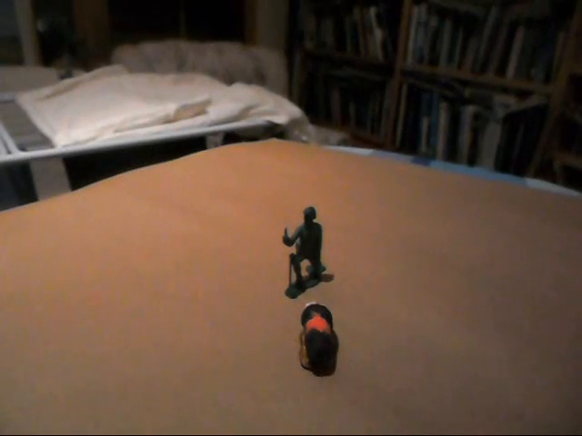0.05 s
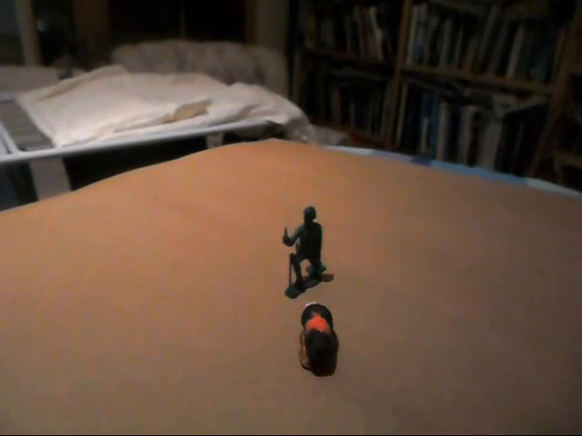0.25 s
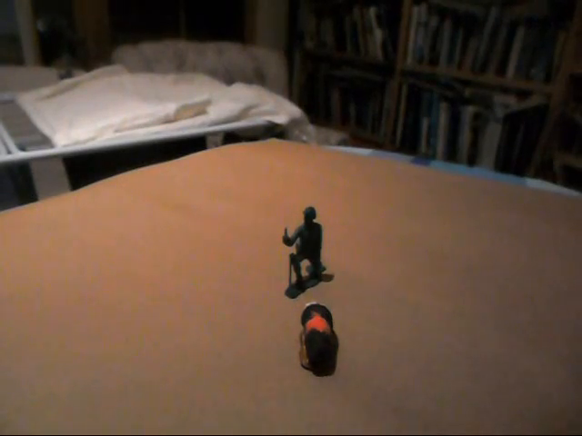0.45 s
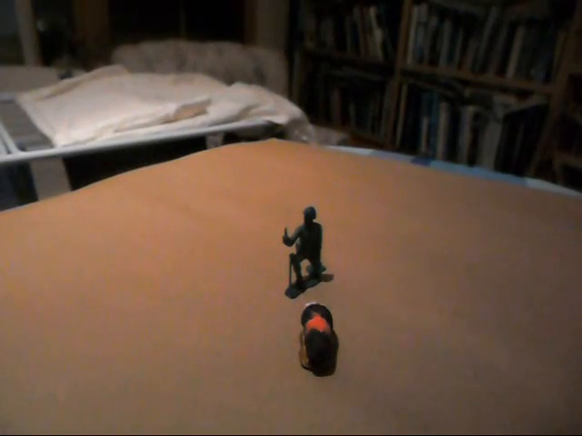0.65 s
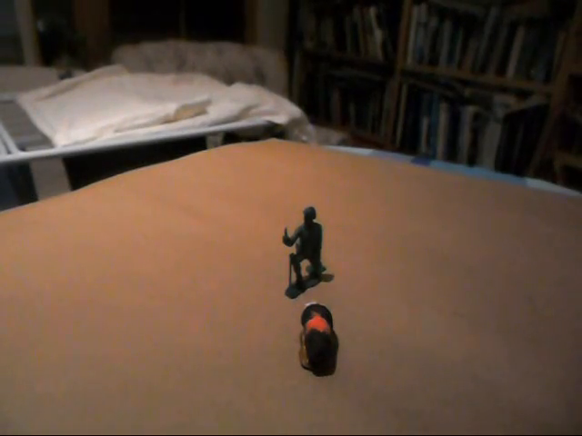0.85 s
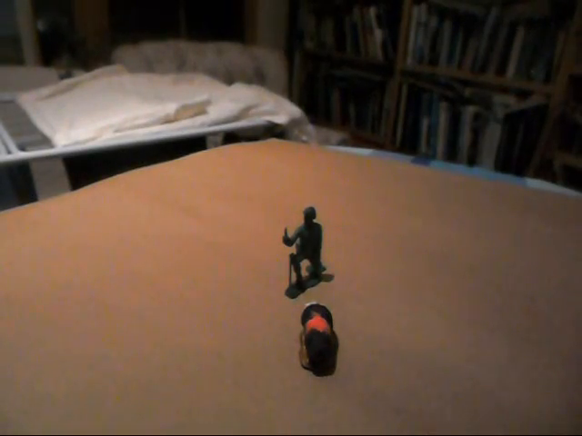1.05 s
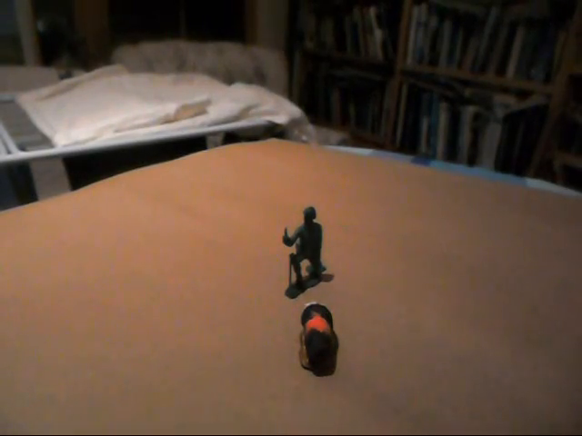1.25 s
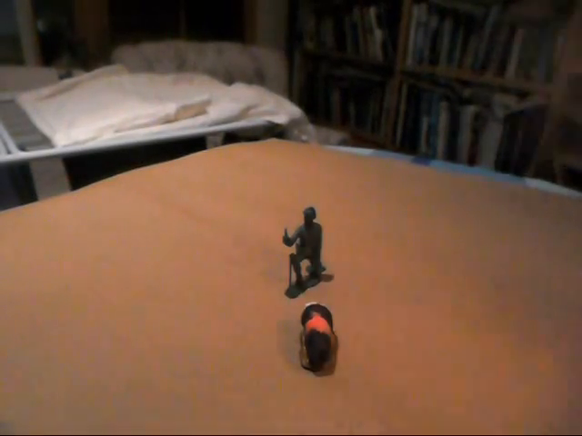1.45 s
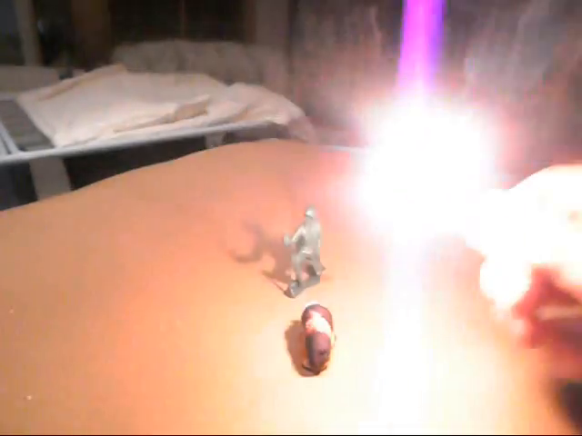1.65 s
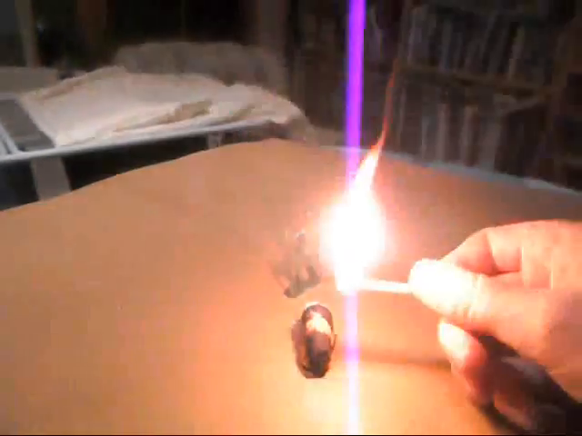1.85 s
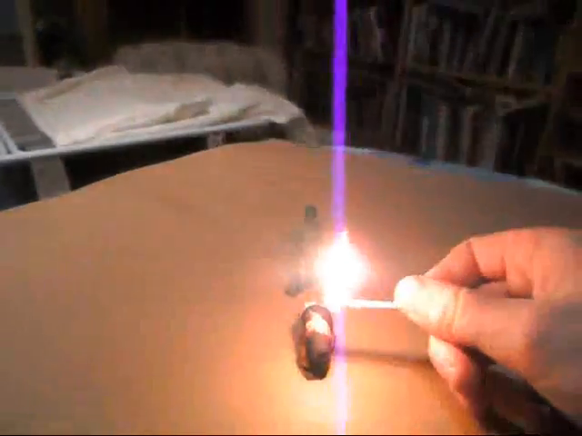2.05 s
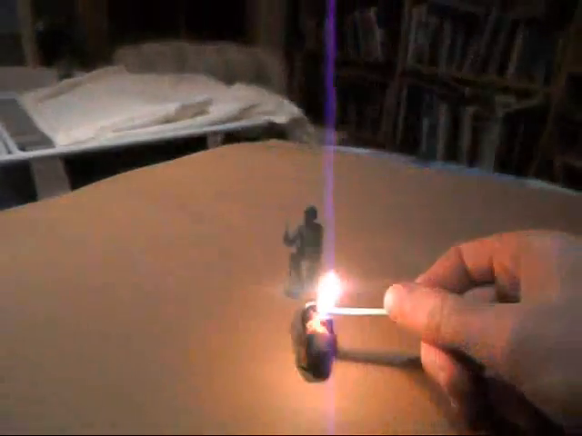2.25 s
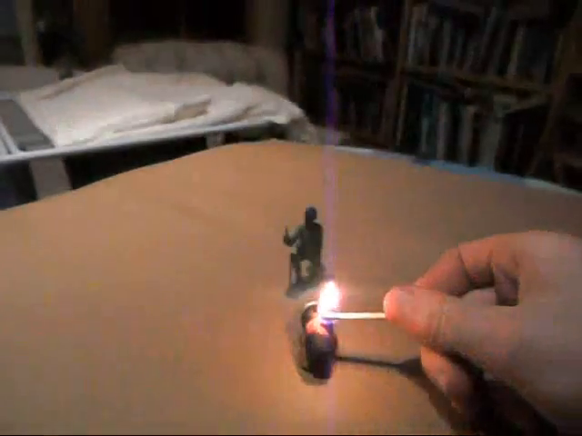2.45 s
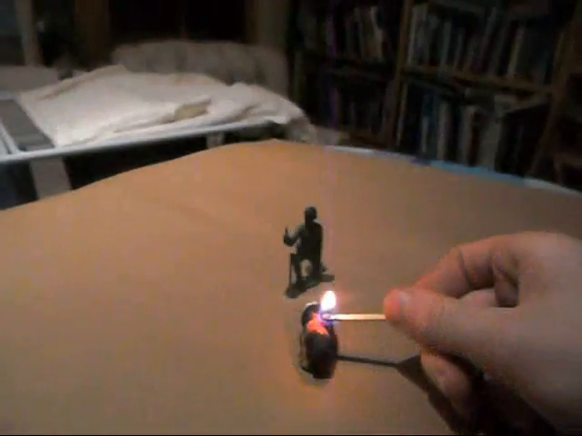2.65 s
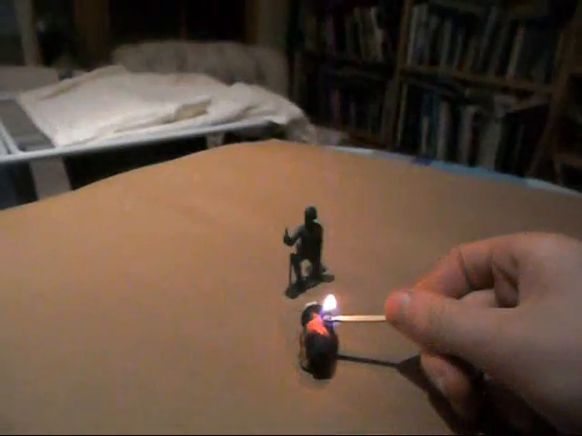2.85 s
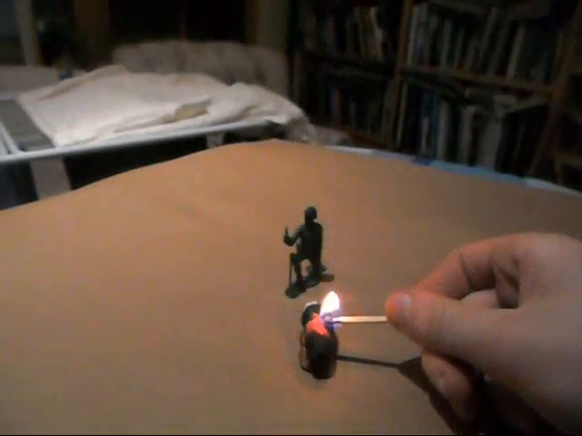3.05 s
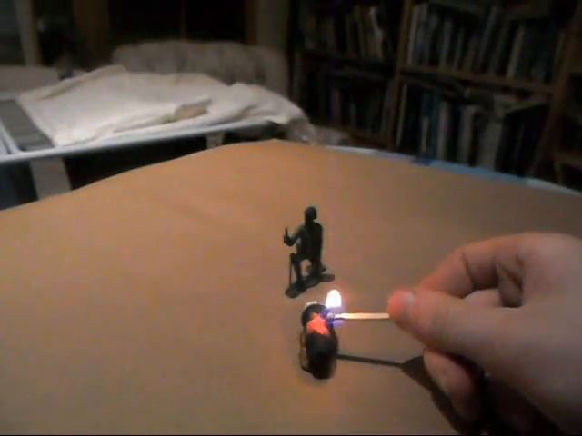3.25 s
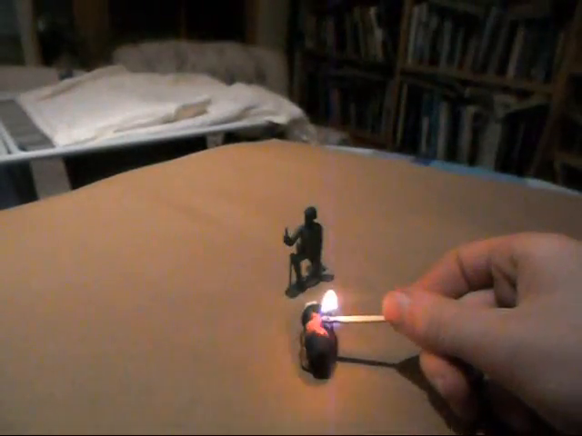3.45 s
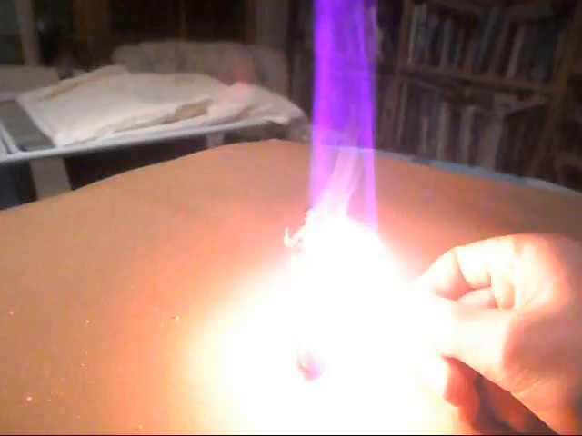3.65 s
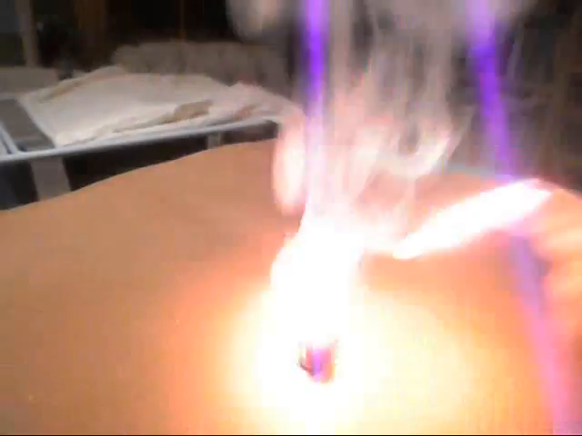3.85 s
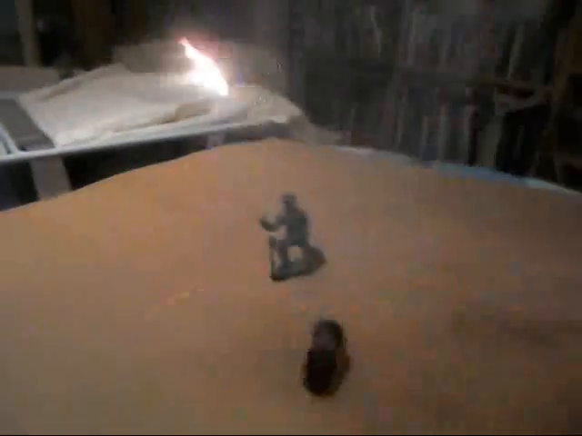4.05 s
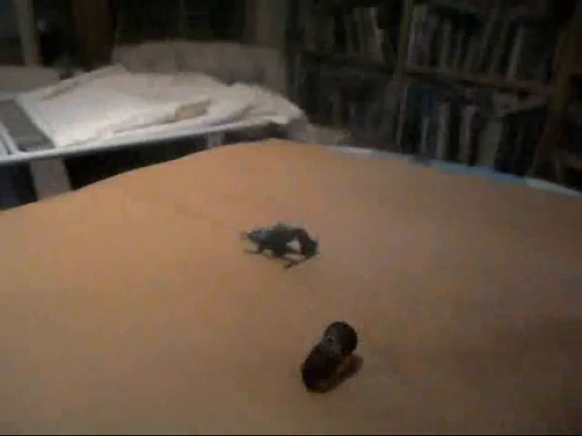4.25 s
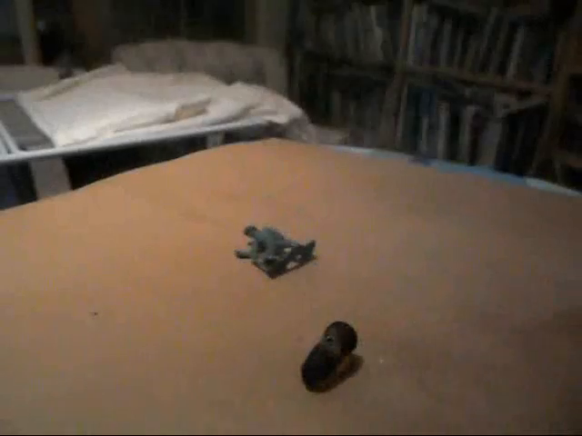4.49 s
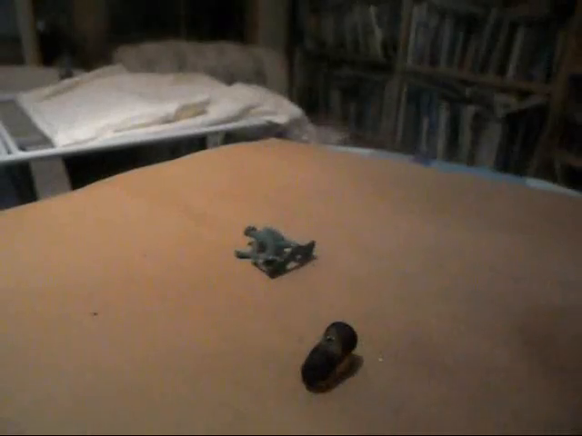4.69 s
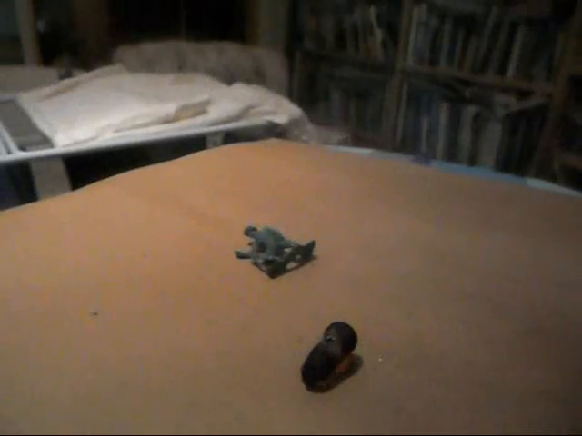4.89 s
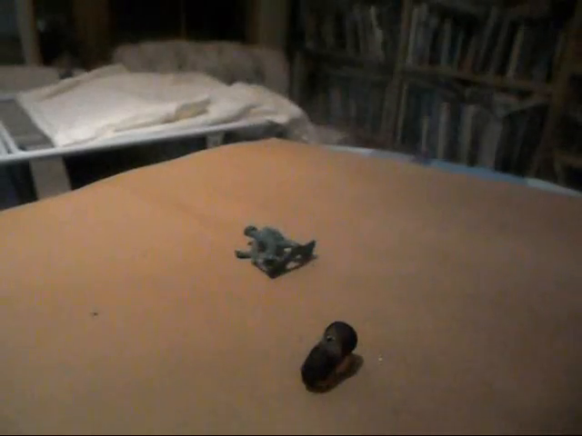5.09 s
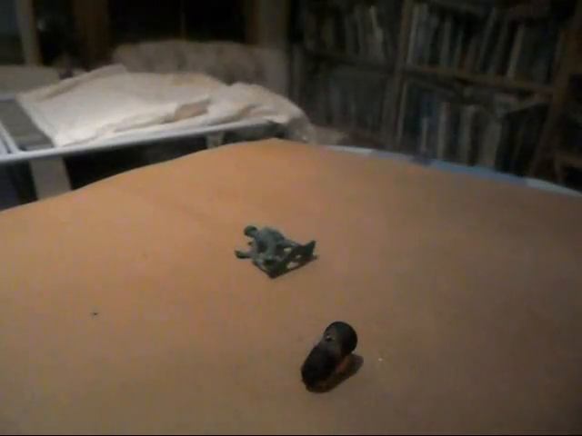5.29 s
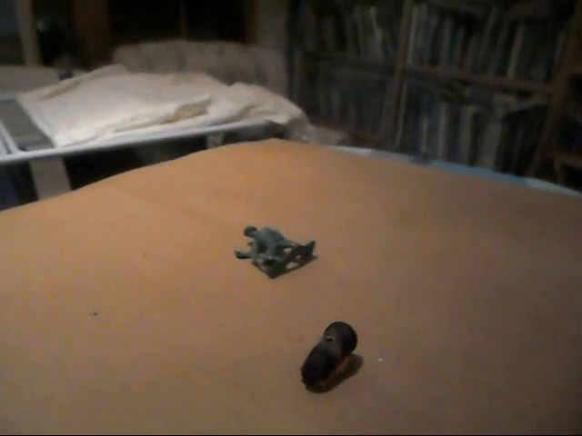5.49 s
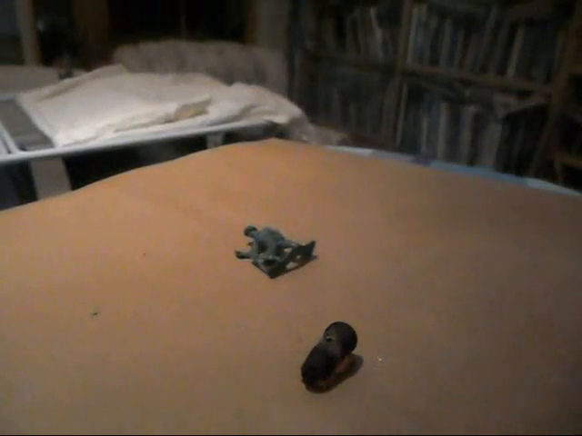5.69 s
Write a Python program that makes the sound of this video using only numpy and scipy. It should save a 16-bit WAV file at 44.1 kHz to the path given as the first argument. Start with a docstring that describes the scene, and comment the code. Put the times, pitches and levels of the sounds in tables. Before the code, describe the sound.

A sharp little matchbox knock opens the sound, with soft cardboard rustling and two lighter clicks in the first half second. Faint scrapes come around 0.8 and 1.1 seconds. At about 1.2 seconds a match rasps along the strip with a few bright snaps, then flares in a soft, crackling hiss until 1.9 seconds. A lull follows, holding only faint microphone hiss, low rumble and a tiny tick or two. The flame flutters softly at 3.5 seconds. From 3.7 seconds priming powder fizzes and sputters, and just before 4.1 seconds a tiny cannon fires with one sharp pop, by far the loudest sound. It overloads the close, cheap microphone, and the small room rings for under half a second. Everything afterwards is quieter, including the hiss. A few very faint, dull taps come between 4.3 and 5.7 seconds as the barrel and a toy figure rock on the table.

```python
"""A tiny cannon pops on a bedroom table: a pressure push snaps into suction and the bore rings.
Before it, a matchbox knocks and rustles, a match rasps along the strip and flares, the flame
flutters at the touch-hole and the priming fizzes. The shot overloads a cheap camera microphone,
whose gain drops and stays down. The room rings briefly and the barrel rocks to rest."""
import sys
import numpy as np
from scipy import signal
from scipy.fft import rfft, irfft, next_fast_len
from scipy.io import wavfile
from scipy.ndimage import uniform_filter1d

SR = 44100
rng = np.random.default_rng(int(sys.argv[2]) if len(sys.argv) > 2 else 0)


def output_pcm(signal):
    """Save a mono or channel-first signal as 16-bit PCM at the path in sys.argv[1].

    Samples are clipped to [-1, 1] before scaling.
    """
    pcm = np.clip(np.atleast_2d(signal).T, -1, 1) * 32767
    wavfile.write(sys.argv[1], SR, np.round(pcm).astype(np.int16))


N = 252693
SHOT_S = 4.07183


def gain_of(db):
    """Decibels to linear gain."""
    return 10 ** (np.asarray(db) / 20)


def unit_rms(x):
    """Scales to rms 1."""
    return x / np.sqrt(np.mean(x ** 2) + 1e-20)


def value_at(points, hz):
    """Reads a curve on a log-frequency axis."""
    f, value = np.transpose(points)
    return np.interp(np.log(hz + 1), np.log(f + 1), value)


def coloured(x, tone):
    """Applies an EQ curve and scales to rms 1."""
    size = next_fast_len(len(x))
    eq = gain_of(value_at(tone, np.fft.rfftfreq(size, 1 / SR)))
    return unit_rms(irfft(rfft(x, size) * eq, size)[:len(x)])


def automation(rows):
    """Rows of (seconds, dB, ...) to curves: a gain, silent outside the rows, then any other columns."""
    s, db, *more = np.transpose(rows)
    t = np.arange(N) / SR
    fade = np.clip(np.minimum(t - s[0] + (s[0] == 0), s[-1] - t) / 0.0036, 0, 1)
    return [fade * gain_of(np.interp(t, s, db))] + [np.interp(t, s, c) for c in more]


def add(mix, start_s, sound):
    """Mixes a sound in at its start time."""
    part = mix[round(start_s * SR):][:len(sound)]
    part += sound[:len(part)]


def resonate(x, hz, width_hz):
    """A resonance: shifts hz down to zero, smooths and shifts back."""
    carrier = np.exp(2j * np.pi * np.cumsum(hz * np.ones(len(x))) / SR)
    pole = np.exp(-np.pi * width_hz / SR)
    return 2 * (carrier * signal.lfilter([1 - pole], [1, -pole], x / carrier + 1e-18)).real


def grains(per_s, spread_db, t60):
    """Tiny noise bursts at random times, slightly varied in size."""
    sizes = gain_of(spread_db * np.minimum(rng.exponential(1, N), 4))
    onsets = rng.random(N) < per_s / SR
    decay = gain_of(-60 * np.arange(400) / SR / t60)
    return unit_rms(signal.oaconvolve(sizes * onsets, decay)[:N] * rng.standard_normal(N))


def patchy(x, depth_db):
    """Lets patches of the spectrum swell and fade at random."""
    spectrum = signal.stft(x, nperseg=256)[2]
    patches = uniform_filter1d(rng.standard_normal(spectrum.shape), size=7, axis=0)
    patches = unit_rms(uniform_filter1d(patches, size=9, axis=1))
    return unit_rms(signal.istft(spectrum * gain_of(depth_db * patches), nperseg=256)[1][:N])


def ticks(rows, relative_width):
    """Short noise bursts, each through its own resonance."""
    out, t = np.zeros(N), np.arange(2000) / SR
    for s, db, hz, length in rows:
        envelope = np.exp(-2 * t / length) * (1 - np.exp(-t / 0.00026))
        burst = resonate(rng.standard_normal(len(t)) * envelope, hz, relative_width * hz)
        add(out, s, gain_of(db) * burst / abs(burst).max())
    return out


def noise_floor():
    """Steady hiss and low rumble."""
    # Noise spectrum. Each row: frequency in Hz, level in dB.
    tone = [(12, -23), (20, 0), (38, 4.5), (64, -5.5), (290, -8), (1100, -13.5), (3400, -17.5), (7000, -20),
            (11500, -22.5)]
    return gain_of(-51.5) * coloured(rng.standard_normal(N), tone)


def bedroom_reverb(x, predelay_s):
    """Reflections as sparse taps of random sign, each band dying at its own speed."""
    # Room decay. Each row: frequency in Hz, time to fall 60 dB in seconds.
    decay_times = [(60, .25), (150, 0.35), (300, 0.36), (700, 0.4), (2500, .4), (9000, 0.33)]
    taps, slots = np.zeros(SR), np.arange(0, SR - 20, 20)
    taps[slots + rng.integers(0, 20, len(slots))] = rng.choice([-1., 1.], len(slots))
    hz, t, spectrum = signal.stft(taps, SR, nperseg=256)
    decay = gain_of(-60 * t / value_at(decay_times, hz)[:, None])
    tail = signal.istft(spectrum * decay, SR, nperseg=256)[1][:SR]
    tail *= np.clip((np.arange(SR) / SR - predelay_s) / 0.0042, 0, 1)
    return signal.fftconvolve(x, tail / np.linalg.norm(tail))[:N]


def box_knocks():
    """Handling knocks set the matchbox ringing."""
    # Knocks. Each row: start in seconds, peak in dB.
    knocks = [(0.0144, -14), (0.0207, -22.5), (.341, -34), (0.369, -36.5)]
    # Box modes. Each row: frequency in Hz, relative level in dB, time to fall 60 dB in seconds.
    modes = [(810, -12, 0.015), (2170, -27, 0.0071), (2550, 10, 0.0091), (3300, 3, 0.0087),
             (4000, -3, 0.016), (6000, 2, 0.0084)]
    out, t = np.zeros(N), np.arange(2000) / SR
    ring = sum(gain_of(db - 60 * t / t60) * np.sin(2 * np.pi * hz * t) for hz, db, t60 in modes)
    for s, db in knocks:
        add(out, s, -gain_of(db) * ring / abs(ring).max())
    return out


def tray_rustle():
    """The cardboard tray slides: a grainy rustle that starts at once and dies away."""
    # Slides. Each row: start in seconds, hold in seconds, level in dB.
    slides = [(0, 0.018, -41.5), (.143, 0.073, -44.5)]
    # Rustle EQ. Each row: frequency in Hz, level in dB.
    tone = [(180, -11), (300, -2.5), (459, -9), (850, 0), (942, -3), (1930, -1), (2110, 0.5), (10000, -17),
            (13000, -46), (22000, -120)]
    release_s, drop_db = .11, 19
    level = sum(automation([(s, db), (s + hold, db), (s + hold + release_s, db - drop_db)])[0]
                for s, hold, db in slides)
    return level * coloured(grains(per_s=4700, spread_db=-2.0, t60=0.0048), tone)


def match_strikes():
    """The match head is pressed along the strip and lifted; dense slips ring the cardboard."""
    # Strokes. Each row: start, peak and end in seconds, top level in dB, loudest region in Hz.
    strokes = [(0.803, 0.803, .812, -47, 1090), (.845, .862, .879, -42, 1100),
               (1.063, 1.08, 1.094, -43, 970), (1.162, 1.23, 1.254, -29, 1330)]
    # Cardboard resonances. Each row: centre in Hz, width in Hz, relative level in dB.
    resonances = [(480, 120, 2.5), (1060, 470, -1), (1330, 380, -0.5), (1780, 1400, -3), (2200, 380, -1.5),
                  (3000, 600, 1), (4370, 1200, 2), (7000, 4300, 5)]
    press_db_per_s, lift_db_per_s, sink_octaves_per_s = 340, 250, 9.4
    out, span = np.zeros(N), slice(0, round(1.3 * SR))
    slips = grains(per_s=5000, spread_db=.8, t60=.004)[span]
    modes = np.array([unit_rms(resonate(resonate(slips, hz, width), hz, width))
                      for hz, width, _ in resonances])
    mode_hz, _, mode_db = np.transpose(resonances)[:, :, None]
    for start, peak, end, db, hz in strokes:
        press_s = peak - start
        touch = (start, db - press_db_per_s * press_s, hz * 2 ** (sink_octaves_per_s * press_s))
        lift = (end, db - lift_db_per_s * (end - peak), hz)
        level, focus_hz = automation([touch, (peak, db, hz), lift])
        # The grip damps modes away from the focus.
        weight = gain_of(mode_db - 14.2 * abs(np.log2(mode_hz / focus_hz[span])))
        rasp = level[span] * (weight * modes).sum(0) / np.linalg.norm(weight, axis=0)
        out[span] += rasp * np.linalg.norm(level) / np.linalg.norm(rasp)
    return out


def burning(envelope, tone, echo, crackle_share, grains_per_s, flicker_db, patch_db):
    """Flickering turbulent hiss and crackling grains, comb-filtered by the table's echo."""
    flicker = gain_of(flicker_db * unit_rms(uniform_filter1d(rng.standard_normal(N), size=400)))
    hiss = patchy(coloured(flicker * rng.standard_normal(N), tone), patch_db)
    crackle = coloured(grains(grains_per_s, spread_db=0.5, t60=0.004), tone)
    blend = np.sqrt(1 - crackle_share) * hiss + np.sqrt(crackle_share) * crackle
    direct = automation(envelope)[0] * blend
    samples = np.arange(N)
    delay_ms = np.interp(samples / SR, *np.transpose(echo))
    bounce = np.interp(samples - delay_ms * SR / 1000, samples, direct)
    bounce_gain = gain_of(-4 - 18 * delay_ms)  # a higher flame has a later, weaker echo
    return (direct + bounce_gain * bounce) / np.hypot(1, bounce_gain)


def match_flare():
    """The head flares and settles; its echo closes in as the match is lowered."""
    # Flare envelope. Each row: time in seconds, level in dB.
    envelope = [(1.244, -36), (1.26, -36.5), (1.3, -39), (1.45, -39.5), (1.54, -40), (1.645, -38),
                (1.78, -46), (1.89, -45.5), (1.905, -56), (1.94, -63)]
    # Flame EQ. Each row: frequency in Hz, level in dB.
    tone = [(35, -28), (60, -13), (230, -2), (412, -6.5), (720, 0), (1250, -3.5), (2280, -2), (6000, -5),
            (11500, -11.5)]
    # Table echo. Each row: time in seconds, delay in milliseconds.
    echo = [(1.3, .55), (1.45, .63), (1.55, .51), (1.64, .44), (1.73, .33), (1.8, .25), (1.85, .22),
            (1.9, .205)]
    return burning(envelope, tone, echo,
                   crackle_share=0.12, grains_per_s=540, flicker_db=1.0, patch_db=2.5)


def flame_flutter():
    """One soft, low gust of the flame at the touch-hole."""
    # Gust EQ. Each row: frequency in Hz, level in dB.
    tone = [(59, -43), (100, -5), (323, 0), (967, -18), (1080, -19), (1340, -22), (4000, -23), (5200, -62),
            (8800, -120)]
    level = automation([(3.45, -59.5), (3.47, -47.5), (3.52, -47.5), (3.56, -59.5)])[0]
    return level * coloured(rng.standard_normal(N), tone)


def sparks():
    """Sparks and grains snap in bright, wide-band clicks."""
    # Snaps. Each row: start in seconds, peak in dB, centre in Hz, length in seconds.
    snaps = [(1.208, -30.5, 4900, 0.0039), (1.2455, -22, 4000, 0.0023), (1.2478, -13.5, 1320, 0.0043),
             (1.2525, -20, 910, 0.0042), (1.2665, -19, 2000, 0.0067), (1.689, -31, 2000, 0.0018),
             (1.721, -24, 7000, 0.0014), (2.062, -35.5, 6000, 0.0017), (3.417, -41, 3500, 0.0023),
             (3.7012, -29, 3000, 0.00076), (3.7058, -33, 3000, 0.0013), (4.375, -34, 6000, 0.0011)]
    return ticks(snaps, relative_width=1.5)


def priming_fizz():
    """The priming powder burns as a jet from the touch-hole, just above the table."""
    # Jet envelope. Each row: time in seconds, level in dB.
    envelope = [(3.698, -37), (3.715, -35.5), (3.74, -28.5), (3.85, -33), (3.94, -33), (4.02, -39.5),
                (4.05, -35.5), (4.084, -27.5)]
    # Jet EQ. Each row: frequency in Hz, level in dB.
    tone = [(35, -42.5), (60, -13), (150, -5.5), (395, -5.5), (674, 0), (1000, -2.5), (1770, -1.5),
            (3000, -7.5), (4100, -9), (4700, -15), (7000, -15.5), (11500, -13.5)]
    # Table echo. Each row: time in seconds, delay in milliseconds.
    echo = [(3.7, .28), (4.06, .26)]
    return burning(envelope, tone, echo,
                   crackle_share=.15, grains_per_s=700, flicker_db=-0.14, patch_db=2.0)


def rocking():
    """The barrel and a toy figure rock on the table after the shot, in dull taps."""
    # Taps. Each row: start in seconds, peak in dB before the gain drops, centre in Hz, length in seconds.
    taps = [(4.265, -25.5, 143, 0.0095), (4.426, -40, 298, 0.0096), (4.79, -42, 297, 0.023),
            (4.992, -40.5, 750, 0.012), (5.688, -38, 644, 0.01), (5.72, -41, 1000, .006)]
    return ticks(taps, relative_width=0.43)


def muzzle_blast():
    """Pressure builds roughly, breaks off and swings into suction while the bore rings."""
    t = np.arange(N) / SR - SHOT_S
    after = np.maximum(t, 0)
    grit = unit_rms(resonate(rng.standard_normal(N), hz=8500, width_hz=2000))  # hot grains leave first
    roughness = 1 + .07 * np.clip(-t / .001, 0, 1) * grit
    push = 2.4 / (1 + np.exp(np.clip(-(t + .00125) / .00038, -50, 50))) * roughness
    suction = -.88 * np.exp(-(after / .0052) ** 2) - 1.5 * np.exp(-after / .0003)
    bore = .5 * np.exp(-after / .009) * np.cos(2 * np.pi * 715 * (after - .0012))
    crossfade = 1 / (1 + np.exp(np.clip(-t / .00006, -50, 50)))
    return (1 - crossfade) * push + crossfade * (suction + bore)


def cannon_shot():
    """The close blast, then walls and room answering its sharp front."""
    # Early reflections. Each row: delay in seconds, level in dB relative to the pulse.
    reflections = [(.0121, -3), (.0148, -1.5), (.0178, 1), (.0189, -4), (.0226, -5.5)]
    # Reverb send EQ. Each row: frequency in Hz, level in dB.
    send_tone = [(50, -6.5), (200, 6.5), (700, 1.5), (1250, -2.5), (1700, -10.5), (3500, -14),
                 (6000, -22.5), (10000, -21)]
    walls, t = np.zeros(N), np.arange(400) / SR
    pulse = np.sin(2 * np.pi * 900 * t) * np.exp(-t / 0.00018)
    for delay_s, db in reflections:
        add(walls, SHOT_S + delay_s, -gain_of(db) * pulse / pulse.max())
    front = coloured(signal.unit_impulse(N, round(SHOT_S * SR)), send_tone)
    front /= abs(front).max()
    return muzzle_blast() + walls + gain_of(15.5) * bedroom_reverb(front, predelay_s=0.0092)


def scene():
    """Mono mix: the small tabletop sounds with a touch of room, the shot and the noise floor."""
    tabletop = (box_knocks() + tray_rustle() + match_strikes() + flame_flutter()
                + sparks() + rocking() + match_flare() + priming_fizz())
    floor = noise_floor()
    room = gain_of(-12.5) * bedroom_reverb(tabletop, predelay_s=.004)
    return (floor + room + tabletop + cannon_shot())[None]


def record(dry):
    """Camera microphone: overload cuts the gain for good; the converter clips and runs at half rate."""
    reaction_s, converter_hz, top_hz = .0037, 10800, 15520
    overloaded = np.maximum.accumulate(abs(dry) > 1, axis=1) * 1.
    trigger = np.pad(overloaded, ((0, 0), (round(reaction_s * SR), 0)))[:, :N]
    gain_db = 0
    for cut_db, attack_s in [(13, .0004), (1.9, .15)]:  # a fast duck and a slow sag
        pole = np.exp(-1 / (attack_s * SR))
        gain_db -= cut_db * signal.lfilter([1 - pole], [1, -pole], trigger)
    anti_alias = signal.firwin(101, converter_hz, fs=SR)
    ducked = signal.oaconvolve(dry * gain_of(gain_db), anti_alias[None], "same")
    clipped = np.clip(ducked, -.98, .98)
    held = np.repeat(clipped[:, ::2], 2, axis=1)[:, :N]  # sample-and-hold mirrors the treble upward
    high_cut = signal.firwin(511, top_hz, window=("kaiser", 9), fs=SR)
    return signal.oaconvolve(held, high_cut[None], "same")


dry = scene()
out = record(dry)
output_pcm(out)
```